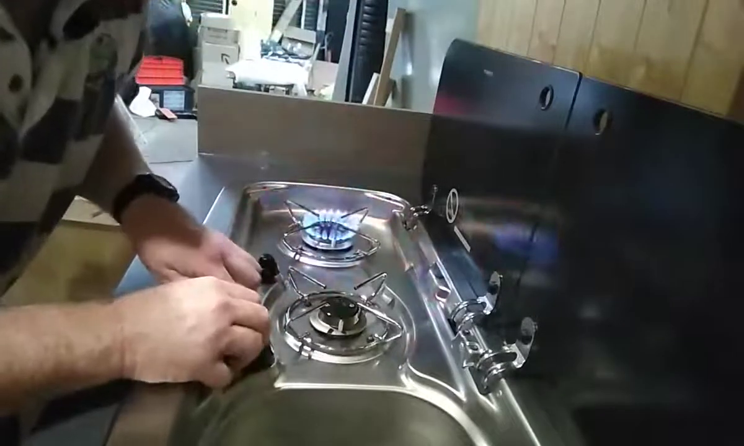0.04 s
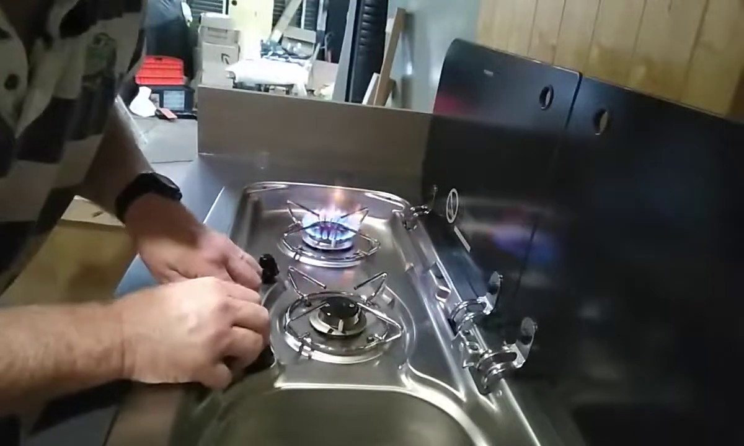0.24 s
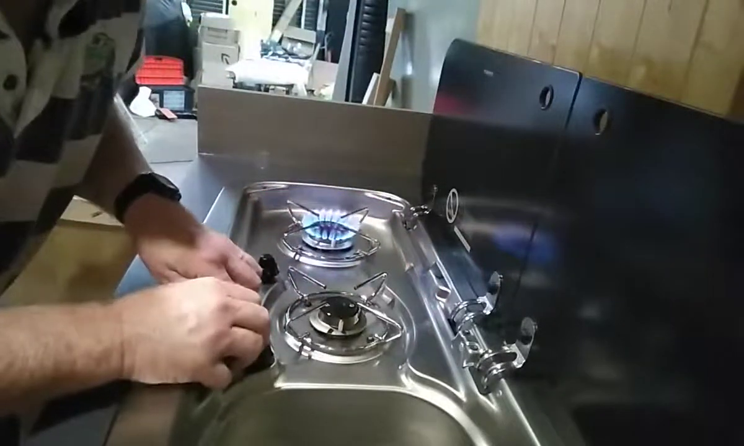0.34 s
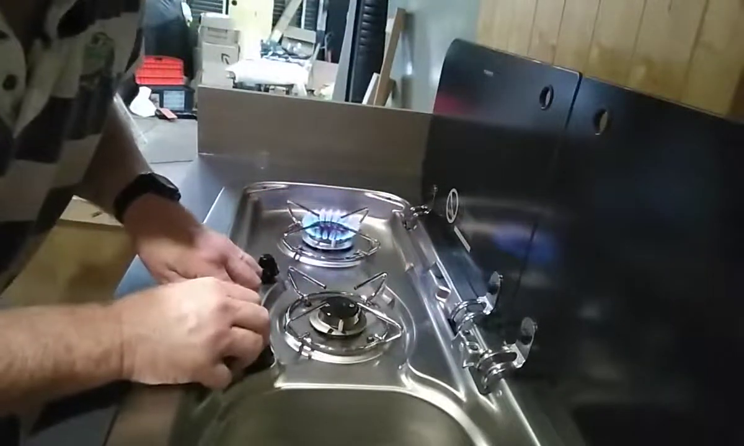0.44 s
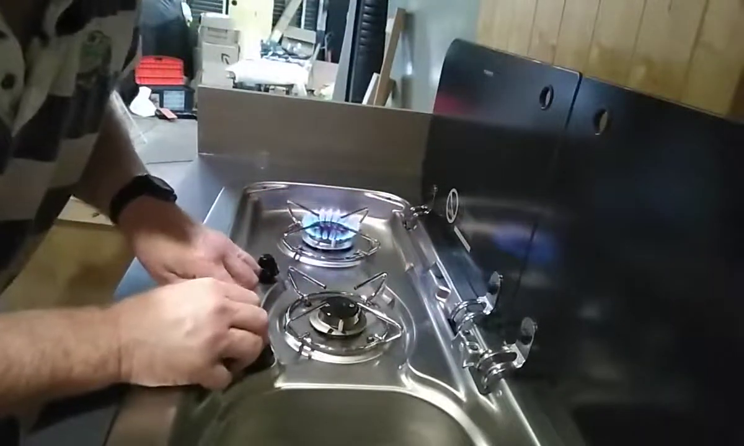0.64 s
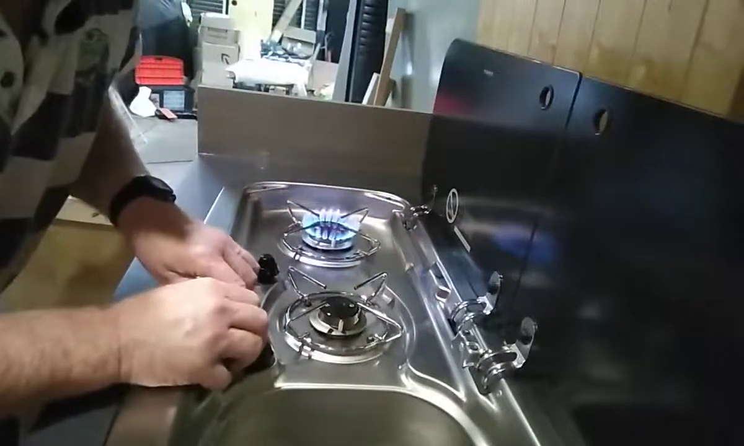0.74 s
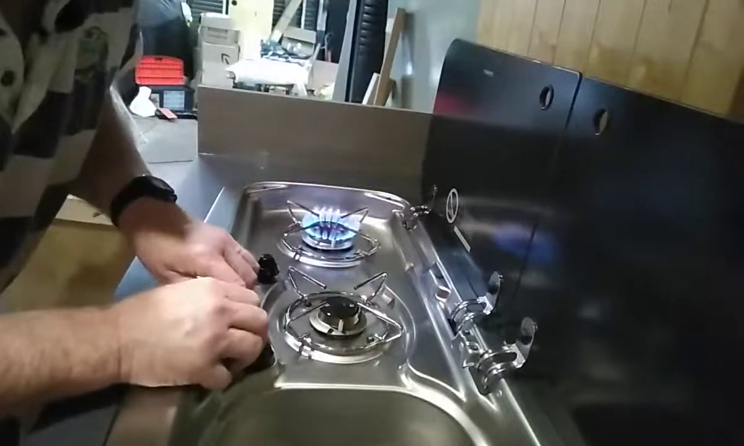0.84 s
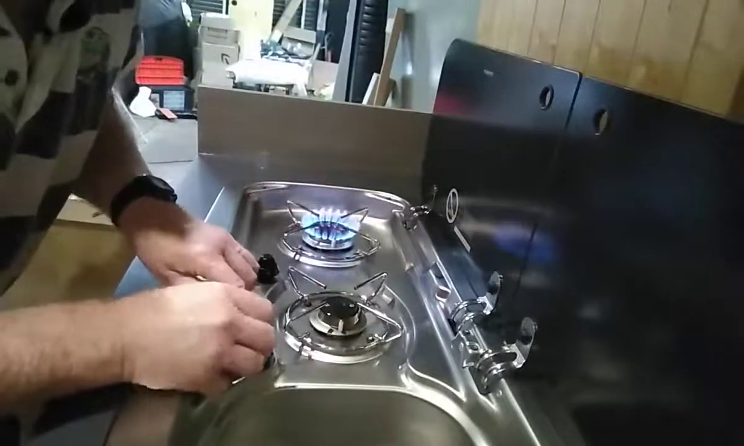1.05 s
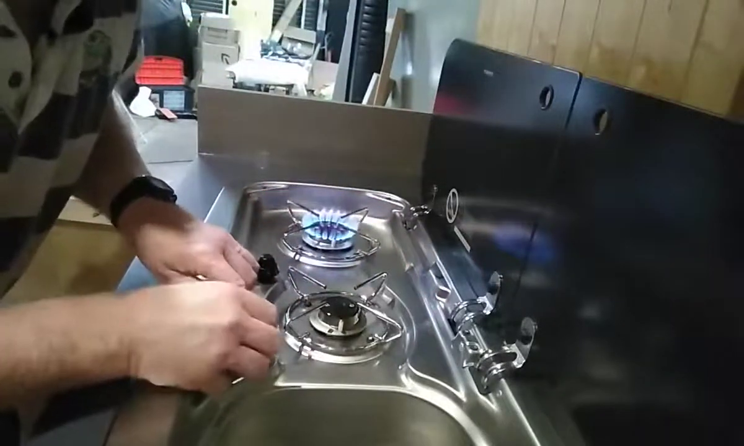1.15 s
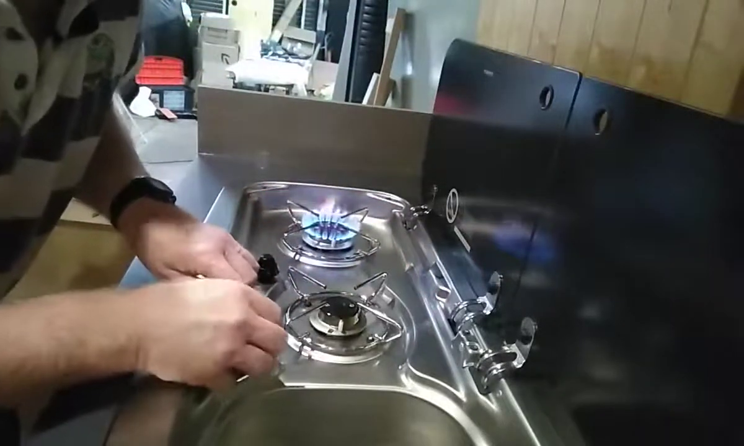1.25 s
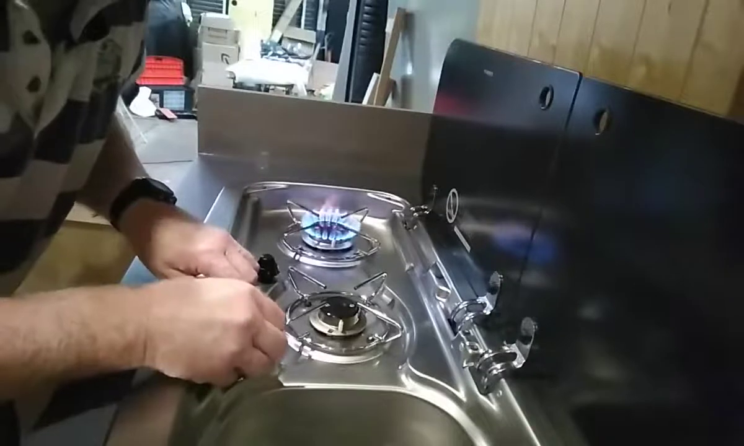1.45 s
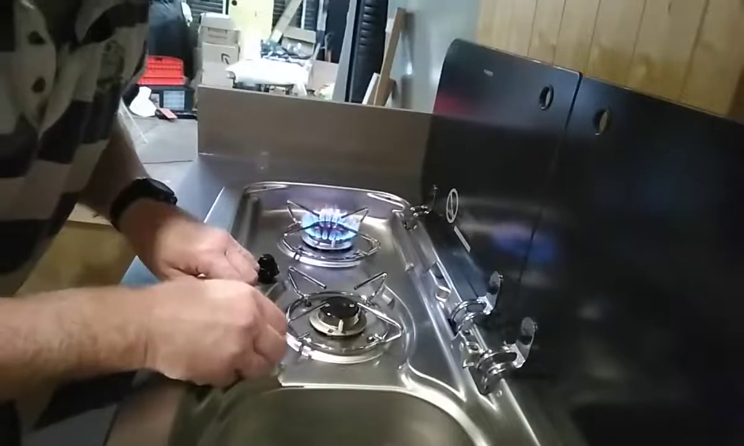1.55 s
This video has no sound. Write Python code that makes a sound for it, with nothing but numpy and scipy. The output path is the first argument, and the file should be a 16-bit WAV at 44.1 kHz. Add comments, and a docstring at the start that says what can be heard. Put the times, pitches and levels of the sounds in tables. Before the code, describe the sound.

A gas hob igniter snaps loudly once, ringing the steel top and pan supports; the control returns with a duller double knock, light ticks and soft taps, over faint hiss in a small cabin, close microphone.

```python
"""Spark igniter on a gas hob

In a small cabin a lit burner murmurs (shaped noise) under a faint hiss with thin whistling bands and dull rubs.
The igniter snaps once, loudly: noise dies band by band while sine modes of the steel top and pan supports ring on.
The control comes back with a duller double knock, then light ticks and soft taps of noise and ringing modes.
Near the end comes a thin squeak, a wavering sine that climbs and slips back. A fast limiter flattens the snap."""
import sys
import numpy as np
from scipy import signal
from scipy.fft import rfft, irfft
from scipy.io import wavfile
from scipy.ndimage import uniform_filter1d

SR = 44100
rng = np.random.default_rng(int(sys.argv[2]) if len(sys.argv) > 2 else 0)


def waveform_to_disk(signal):
    """Save audio, clipped to [-1, 1], as 16-bit WAV at the path in sys.argv[1]."""
    frames = np.transpose(np.atleast_2d(signal))
    scaled = np.clip(frames, -1, 1) * 32767
    samples = np.round(scaled).astype(np.int16)
    wavfile.write(sys.argv[1], SR, samples)


N = 70560
T = np.arange(N) / SR  # s
HZ = np.maximum(np.arange(N // 2 + 1) * SR / N, 1)  # spectrum bins, kept above zero for the logarithms

# All levels are set ahead of the limiter; colours are relative, since the noise is scaled to rms 1.
# Murmur of the lit burner, colour: [f/Hz, level/dB per Hz]
FLAME_COLOUR = [(25, -53), (50, -31.5), (75, 5), (125, -6.5), (160, -14), (220, -6), (300, -25), (600, -50)]
# Murmur of the lit burner, loudness: [t/s, level/dB]
FLAME_LEVEL = [(0, -57.5), (.17, -57), (.33, -45.5), (.63, -51), (.75, -56), (.87, -43.5), (1.12, -52.5),
               (1.32, -53.5), (1.6, -59)]
# Faint steady hiss, colour: [f/Hz, level/dB per Hz]
HISS_COLOUR = [(200, -3.5), (330, -8.5), (550, -18.5), (900, -8.5), (1200, -11), (1650, 0.5), (2000, -7),
               (2130, -15.5), (2270, -5), (2400, -30), (3100, -28.5), (4800, -38.5), (12000, -36.5),
               (16000, -35.5)]
HISS_DB = -58.5
HISS_WAVER_DB, HISS_WAVER_S = 1, 0.12  # depth and step; each band wavers on its own
# Faintly whistling bands in the hiss: [f/Hz, width/Hz, level/dB]
WHISTLES = [(3690, 340, -73.5), (4420, 50, -90), (6350, 45, -91.5), (9360, 120, -82.5), (9760, 150, -85),
            (10230, 70, -87.5), (12680, 200, -78.5), (14600, 600, -80)]
WHISTLE_WAVER_DB, WHISTLE_WAVER_S = 4.5, 0.062  # depth and step
# Soft, low handling noises at the hob: [t/s, level/dB, half length/s, pitch f/Hz]
RUBS = [(0.015, -56.5, 0.11, 603), (0.628, -52, 0.032, 403), (0.742, -46, 0.03, 373),
        (0.786, -51.5, 0.028, 595), (0.906, -46.5, 0.017, 90), (0.994, -52.5, 0.03, 257),
        (1.15, -58.5, 0.026, 298), (1.318, -53, 0.023, 90.2), (1.507, -54.5, 0.049, 201)]
# Their common colour: [f/Hz, level/dB per Hz]
RUB_COLOUR = [(25, -44.5), (70, -4), (200, -3.5), (620, -12), (1200, -14.5), (2500, -35.5), (6000, -50.5)]
RUB_WIDTH_HZ, RUB_LIFT_DB = 67, 17.5  # peak at each rub's pitch

# The igniter's snap, one event: [t/s, level/dB, steel ring/dB, thump/dB, f/Hz where the mode drive is 6 dB down]
SNAP = (0.2158, -4.5, -25, -7, 12000)
# Control's knock and its rebound, ahead of the contact lift: [columns as for the snap]
KNOCKS = [(0.804, -24.5, -48.5, -31.5, 1500), (0.8118, -29.5, -66, -50, 1500)]
# Colour of the snap's dense vibration: [f/Hz, level/dB per Hz]
SNAP_COLOUR = [(30, -47.5), (70, -19.5), (120, -13.5), (163, -24.5), (215, -9), (290, -12.5), (355, -5),
               (490, -3.5), (660, -0.5), (830, -7), (1230, -0.5), (1600, -7.5), (2060, -5.5), (2900, -18.5),
               (4100, -11.5), (5000, -15), (5950, -12), (6700, -22), (9800, -16), (13200, -21.5),
               (16000, -23.5)]
# Colour of the knocks' dense vibration: [f/Hz, level/dB per Hz]
KNOCK_COLOUR = [(30, -34), (87, 5), (160, -14), (380, 2.5), (559, -9), (635, 2), (746, -5), (884, -6.5),
                (960, -2), (1200, 0.5), (1460, 2), (1620, -8.5), (2050, -9), (2200, -27), (2320, -11),
                (2500, -19.5), (3100, -25), (4400, -30), (7000, -33.5), (10100, -43.5), (16000, -38)]
# First decay of the hob's dense vibration after the snap: [f/Hz, t60/s]
SNAP_DECAY = [(100, 0.53), (350, 0.3), (1200, 0.3), (5000, 0.3), (13000, 0.22)]
# The same after a knock: [f/Hz, t60/s]
KNOCK_DECAY = [(100, 0.26), (350, 0.23), (1200, 0.17), (5000, 0.14), (13000, 0.12)]
# Slower tail of hob and cabin after the snap: [f/Hz, t60/s, level/dB against the first decay]
SNAP_TAIL = [(100, 0.91, -19.5), (350, 1.4, -28.5), (1200, 0.83, -25), (5000, 0.75, -26.5),
             (13060, 0.44, -29)]
# The same after a knock: [f/Hz, t60/s, level/dB against the first decay]
KNOCK_TAIL = [(100, 1.27, -16), (1190, 0.71, -23), (5000, 0.9, -15), (13000, 0.36, -10)]
# Clear modes of the steel top and pan supports: [f/Hz, level/dB against the event's ring, t60/s]
STEEL_MODES = [(283.9, -3, 0.94), (366.1, 8.5, 0.28), (487.7, 6, 0.27), (496.4, -7.5, 0.95),
               (592, 8.5, 0.32), (666.8, 9.5, 0.38), (886.4, -3.5, 0.61), (1008, 3, .2), (1065, 1, 0.35),
               (1196, 13.5, .27), (1253, 9.5, 0.21), (1306.6, 8.5, .22), (1464, -1.5, 0.43),
               (1800, 4.5, 0.33), (2025, 4, 0.31), (2310, 1.5, .28), (4430, -26.5, 1.5), (4750, -3.5, 0.25)]
# The cabinet under the hob, one damped mode: [f/Hz, level/dB against the event's thump, t60/s]
CABINET_THUMP = [(358, 1, .08)]
# Bright resonances of the hob: [f/Hz, width/Hz, lift/dB]
BRIGHT = [(3345, 100, 5), (4030, 200, 5.5), (4710, 130, 5.5), (5350, 120, 2.5), (5850, 230, 5.5),
          (7630, 180, 9), (12620, 300, 6), (13955, 60, 7.5)]
RIPPLE_DB, RIPPLE_HZ = 2.5, 60  # depth and spacing of the lesser resonances crowded between them
LEAD_S, LEAD_DB = 0.008, -30.5  # the slip ahead of the snap: build-up time and final level
ATTACK_S = 0.0012  # every contact takes a moment to spread through the steel
RATTLE_DB, RATTLE_S = 0.5, 0.0015  # loose parts chatter while the hob vibrates: depth and grain
CONTACT_DB, CONTACT_T60_S = 0, 0.044  # direct sound of a knock or tap, briefly on top of the vibration

# Light metallic ticks of the knob: [t/s, level/dB, ring/dB, tilt/dB per octave]
TICKS = [(0.9162, -50, -46, -1), (1.133, -60, -78, 4)]
# Colour of the ticks ahead of the tilt: [f/Hz, level/dB per Hz]
TICK_COLOUR = [(1500, -15), (3000, -1), (4800, -6), (5600, -15), (6500, -2.5), (8500, -11.5), (12000, -2),
               (15000, -1), (16000, -9)]
# Ringing modes of the ticks: [f/Hz, level/dB against the tick's ring, t60/s]
TICK_MODES = [(1984, -0.5, 0.16), (4700, 0, 0.076), (4930, -8, .14), (6370, -16, .12)]
TICK_T60_S = 0.2
# Soft taps of the knob settling, ahead of the contact lift: [t/s, level/dB, t60/s]
TAPS = [(0.9672, -37, 0.12), (0.9936, -44, 0.07)]
# Colour of the taps: [f/Hz, level/dB per Hz]
TAP_COLOUR = [(150, 0), (400, 3.5), (900, 0), (1400, 12.5), (2000, 6.5), (2600, -14), (5000, -23),
              (9000, -39), (16000, -62)]
# Thin squeak: [t/s, f/Hz, level/dB]
SQUEAK = [(1.41, 810, -85), (1.435, 825, -59), (1.465, 827, -57.5), (1.495, 856, -51.5),
          (1.525, 901, -65.5), (1.58, 853, -69), (1.6, 847, -52.5)]
SQUEAK_WAVER = 0.0086  # rms, as a share of the pitch

WIDE_ABOVE_HZ, WIDE_DB = 11200, -12  # only the highest treble differs between the ears
LIMIT_DB, LIMIT_WINDOW_S, RELEASE_DB_PER_S = -12, 0.003, 407
CUTOFF_HZ = 15800


def from_db(db):
    """Decibels to gain."""
    return 10 ** (np.asarray(db) / 20)


def rms_one(x):
    """Scale to unit rms."""
    return x / np.sqrt(np.mean(x ** 2) + 1e-20)


def at_hz(points, hz, axis=1):
    """Read a table's column on a log-frequency axis."""
    points = np.array(points)
    return np.interp(np.log(hz), np.log(points[:, 0]), points[:, axis])


def in_time(rows):
    """Read each column of a curve at every sample."""
    times, *columns = np.transpose(rows)
    return [np.interp(T, times, column) for column in columns]


def noise(colour, extra_db=0):
    """Random-phase noise of a given colour, rms 1."""
    phases = np.exp(2j * np.pi * rng.random(len(HZ)))
    gains = from_db(at_hz(colour, HZ) + extra_db)
    return rms_one(irfft(phases * gains, N))


def split(spectrum, centres):
    """Overlapping bands of a spectrum, each as a waveform; together they add up to the whole."""
    bands = []
    for corner_values in np.eye(len(centres)):
        share = np.interp(np.log(HZ), np.log(centres), corner_values)
        bands.append(irfft(spectrum * share, N))
    return bands


def drift(step_s):
    """A random wander that reaches a new value every step."""
    values = rng.standard_normal(size=3000)
    return np.interp(T / step_s, np.arange(len(values)), values)


def lift_db(peaks):
    """Lift at each frequency from a table of resonances."""
    return sum(db / (1 + (2 * (HZ - hz) / width) ** 2) for hz, width, db in peaks)


def dying(start, t60):
    """Envelope that rises quickly at its start and dies away exponentially."""
    age = np.maximum(T - start, 0)
    rise = np.sin(np.pi / 2 * np.minimum(age / ATTACK_S, 1)) ** 2
    return rise * np.exp(-np.log(1000) * age / t60)


def ring(start, modes):
    """Decaying sine modes set ringing together, each with a random sign."""
    out = 0
    for hz, db, t60 in modes:
        gain = rng.choice([-1, 1]) * from_db(db)
        out = out + gain * dying(start, t60) * np.sin(2 * np.pi * hz * (T - start))
    return out


def contact(start):
    """Gain that lifts the first moments of a contact, for its direct sound."""
    return 1 + from_db(CONTACT_DB) * dying(start, CONTACT_T60_S)


def flame():
    """The lit burner's murmur: low noise riding a loudness curve."""
    level_db, = in_time(FLAME_LEVEL)
    return from_db(level_db) * noise(FLAME_COLOUR)


def hiss():
    """Faint noise whose bands waver slightly and independently."""
    bands = split(rfft(noise(HISS_COLOUR)), np.geomspace(250, 16000, 16))
    wavering = sum(band * from_db(HISS_WAVER_DB * drift(HISS_WAVER_S)) for band in bands)
    return from_db(HISS_DB) * wavering


def whistles():
    """Thin bands of noise, each swelling and fading on its own."""
    out = 0
    for hz, width, db in WHISTLES:
        resonance = 1 / (1 + (2 * (HZ - hz) / width) ** 4)
        band = irfft(rfft(rng.standard_normal(N)) * resonance, N)
        swelling = band * from_db(WHISTLE_WAVER_DB * drift(WHISTLE_WAVER_S))
        out = out + from_db(db) * rms_one(swelling)
    return out


def handling():
    """Dull noise rubs that swell and fade, each peaking around its own low pitch."""
    out = 0
    for centre, db, half_length, hz in RUBS:
        swell = np.exp(-((T - centre) / half_length) ** 2)
        pitch_lift = lift_db([(hz, RUB_WIDTH_HZ, RUB_LIFT_DB)])
        out = out + from_db(db) * swell * noise(RUB_COLOUR, pitch_lift)
    return out


def hob_response():
    """Gain of the hob: its bright resonances and, from the lowest of them up, a random ripple of lesser ones."""
    ripple = rng.standard_normal(size=1000)
    ripple_db = RIPPLE_DB * np.interp(HZ / RIPPLE_HZ, np.arange(len(ripple)), ripple)
    return from_db(lift_db(BRIGHT) + ripple_db * (HZ > BRIGHT[0][0]))


def blow(event, colour, decay, tail, response):
    """A blow on the hob: crowded vibration dying octave by octave, a slower tail, clear steel modes and a thump."""
    start, db, ring_db, thump_db, contact_hz = event
    spectrum = rfft(noise(colour)) * response
    centres = np.geomspace(62.5, 16000, 9)  # octaves
    dense = 0
    for hz, band in zip(centres, split(spectrum, centres)):
        early = dying(start, at_hz(decay, hz))
        late = from_db(at_hz(tail, hz, axis=2)) * dying(start, at_hz(tail, hz))
        dense = dense + band * np.hypot(early, late)
    rattling = from_db(db + RATTLE_DB * drift(RATTLE_S)) * dense
    # the contact drives high modes less
    modes = [(hz, mode_db - 20 * np.log10(1 + (hz / contact_hz) ** 2), t60) for hz, mode_db, t60 in STEEL_MODES]
    steel = from_db(ring_db) * ring(start, modes)
    thump = from_db(thump_db) * ring(start, CABINET_THUMP)
    return rattling + steel + thump


def slip():
    """A brief noise building up to the snap and cut off as the snap reaches full force."""
    build_up = np.clip((T - SNAP[0]) / LEAD_S + 1, 0, 1)
    before_end = T < SNAP[0] + ATTACK_S
    return from_db(LEAD_DB) * noise(SNAP_COLOUR) * build_up * before_end


def snap(response):
    """The igniter's hard blow, exciting the steel far up into the treble."""
    return blow(SNAP, SNAP_COLOUR, SNAP_DECAY, SNAP_TAIL, response)


def snap_spread(response):
    """Top treble of a second, separately drawn snap, for the difference between the ears."""
    treble = rfft(snap(response)) * np.clip((HZ - WIDE_ABOVE_HZ) / 300, 0, 1)
    return from_db(WIDE_DB) * irfft(treble, N)


def control_knocks(response):
    """The control coming back and rebounding: duller blows, each with its direct sound on top."""
    out = 0
    for knock in KNOCKS:
        out = out + contact(knock[0]) * blow(knock, KNOCK_COLOUR, KNOCK_DECAY, KNOCK_TAIL, response)
    return out


def knob_ticks():
    """Bright dying noise with a short metallic ring of sine modes."""
    out = 0
    for start, db, ring_db, tilt in TICKS:
        click = from_db(db) * noise(TICK_COLOUR, tilt * np.log2(HZ)) * dying(start, TICK_T60_S)
        out = out + click + from_db(ring_db) * ring(start, TICK_MODES)
    return out


def knob_taps():
    """Dull, quickly dying noise as the knob settles, with its direct sound on top."""
    return sum(from_db(db) * noise(TAP_COLOUR) * dying(start, t60) * contact(start) for start, db, t60 in TAPS)


def squeak():
    """A faint, nearly pure tone: a sine whose wavering pitch climbs and then slips back."""
    hz, db = in_time(SQUEAK)
    waver = rms_one(uniform_filter1d(rng.standard_normal(N), size=300))
    phase = 2 * np.pi * np.cumsum(hz * (1 + SQUEAK_WAVER * waver)) / SR
    started = T > SQUEAK[0][0]
    return np.sqrt(2) * from_db(db) * started * np.sin(phase)  # root two makes the level rms


def scene():
    """Everything sits in the centre; the snap's top treble spreads a little."""
    response = hob_response()
    background = flame() + hiss() + whistles()
    igniter = slip() + snap(response) + control_knocks(response)
    mid = background + handling() + igniter + knob_ticks() + knob_taps() + squeak()
    side = snap_spread(response)
    return np.array([mid + side, mid - side])


def record(dry):
    """A fast limiter holds loud sound at one level and lets go steadily; a steep lowpass cuts the top."""
    power = uniform_filter1d(np.mean(dry ** 2, axis=0), max(int(LIMIT_WINDOW_S * SR), 1))
    over_db = np.maximum(10 * np.log10(np.maximum(power, 1e-12)) - LIMIT_DB, 0)
    # a running maximum on a rising slope: the reduction falls at the release rate
    release_db = RELEASE_DB_PER_S * T
    held_db = np.maximum.accumulate(over_db + release_db) - release_db
    lowpass = signal.ellip(10, 0.1, 80, CUTOFF_HZ, fs=SR, output="sos")
    return signal.sosfilt(lowpass, dry * from_db(-held_db))


dry = scene()
out = record(dry)
waveform_to_disk(out)
```